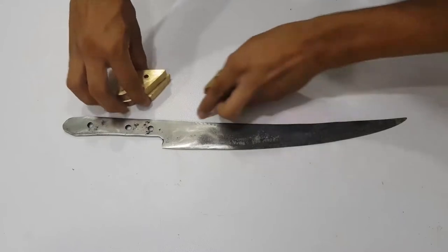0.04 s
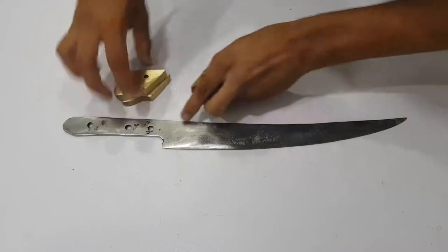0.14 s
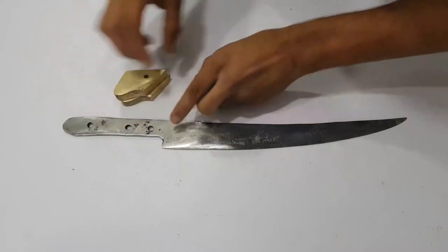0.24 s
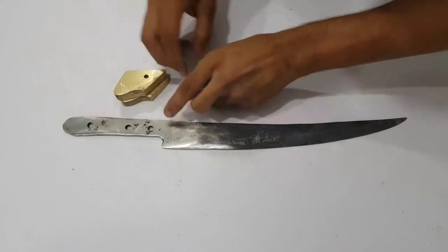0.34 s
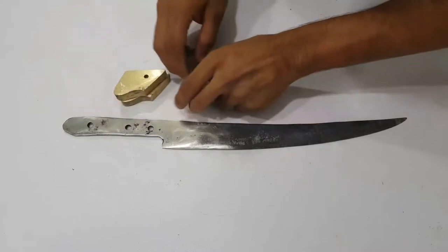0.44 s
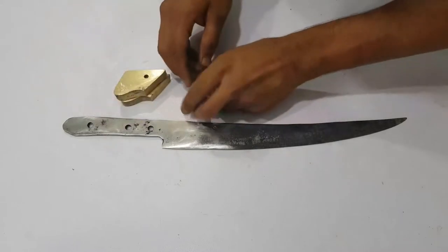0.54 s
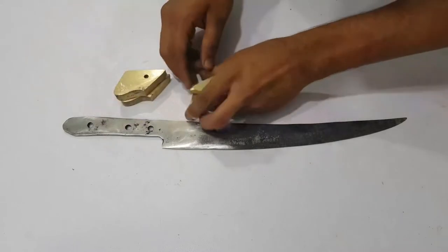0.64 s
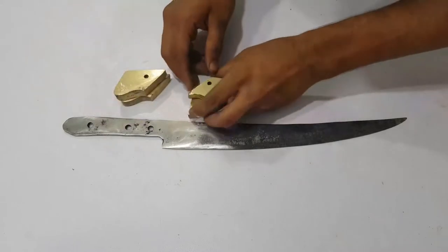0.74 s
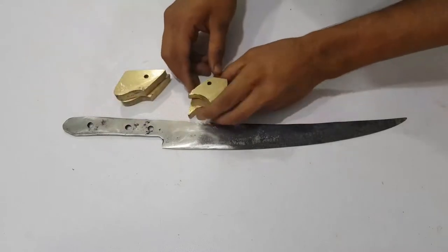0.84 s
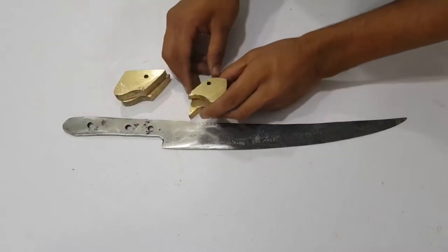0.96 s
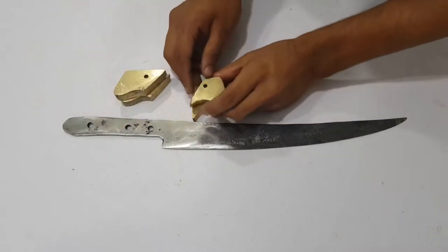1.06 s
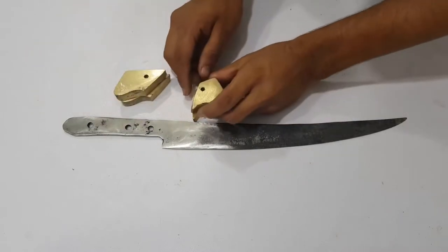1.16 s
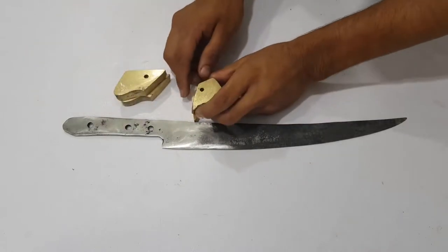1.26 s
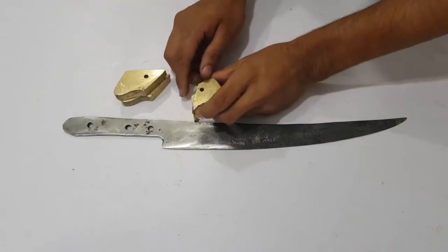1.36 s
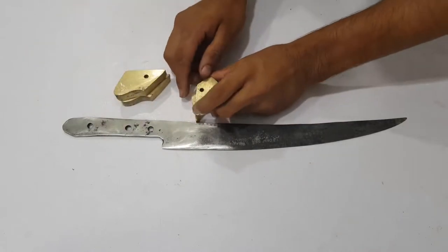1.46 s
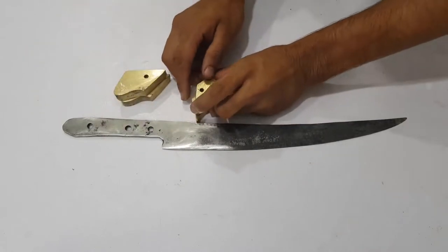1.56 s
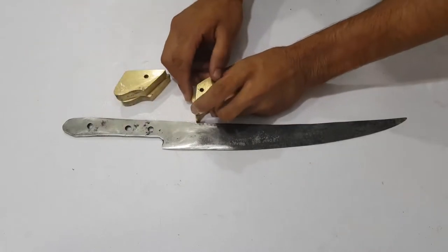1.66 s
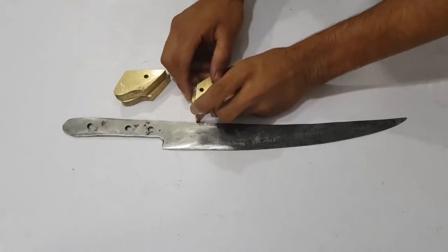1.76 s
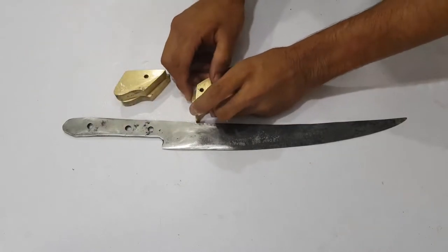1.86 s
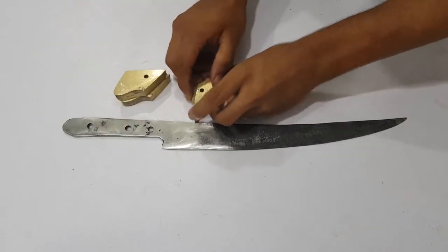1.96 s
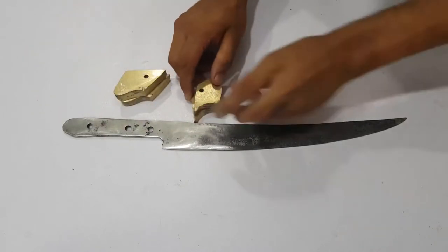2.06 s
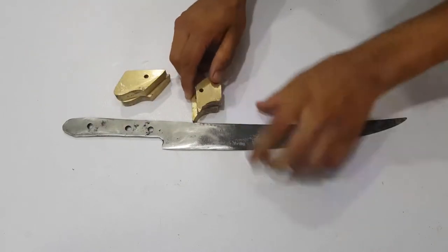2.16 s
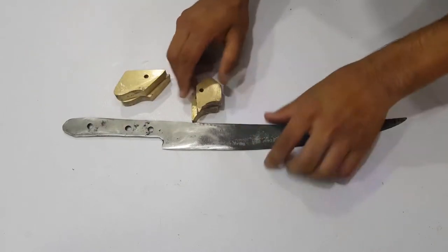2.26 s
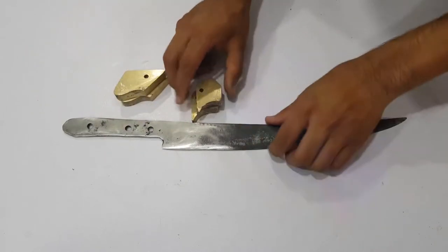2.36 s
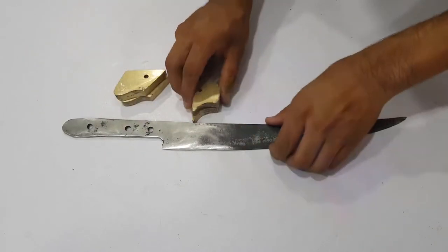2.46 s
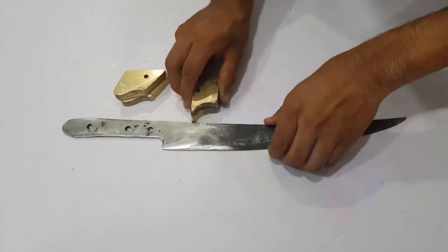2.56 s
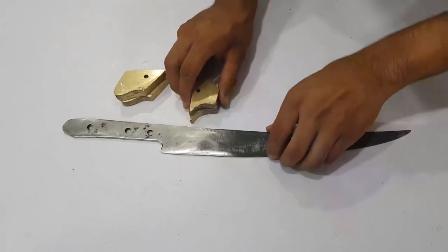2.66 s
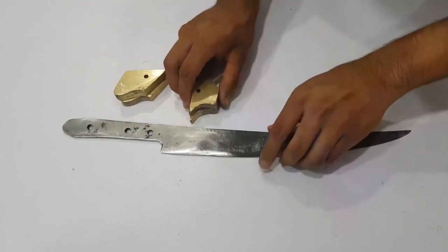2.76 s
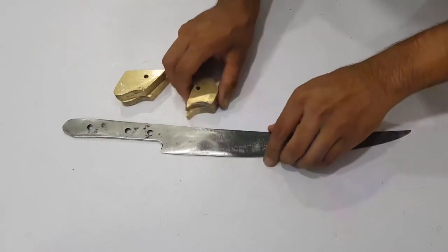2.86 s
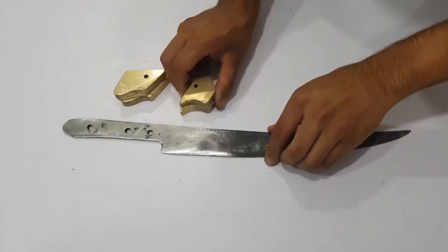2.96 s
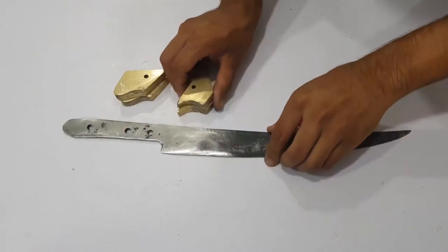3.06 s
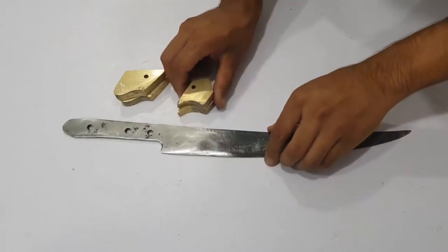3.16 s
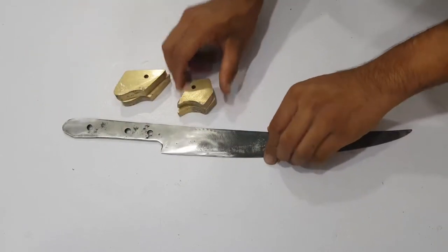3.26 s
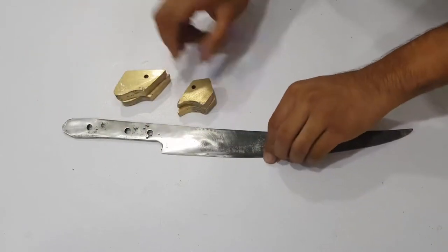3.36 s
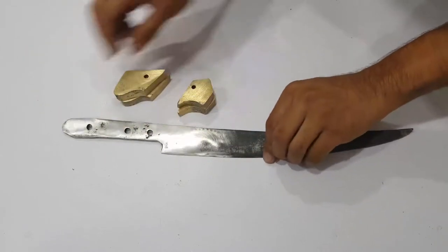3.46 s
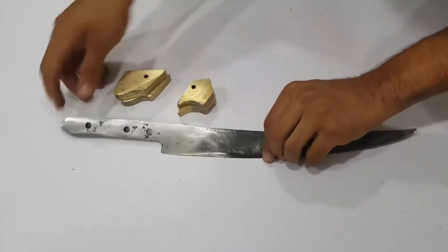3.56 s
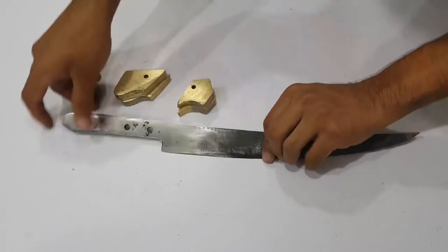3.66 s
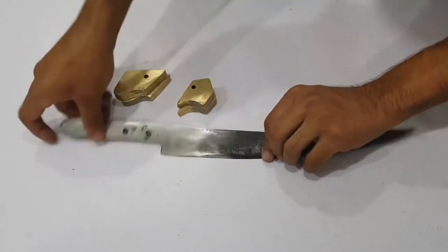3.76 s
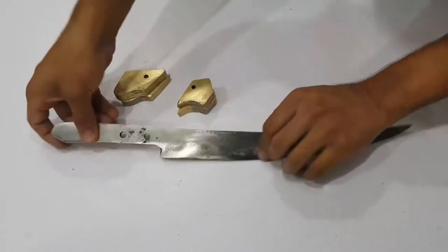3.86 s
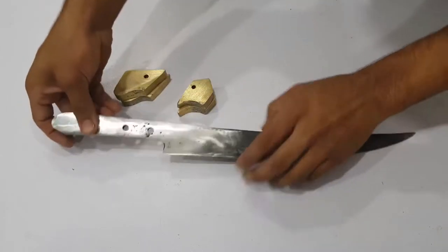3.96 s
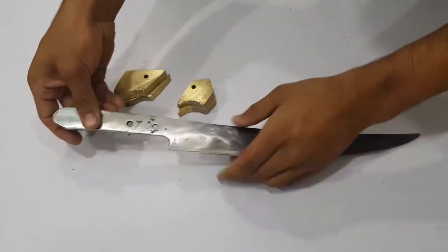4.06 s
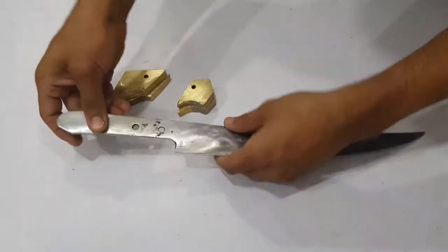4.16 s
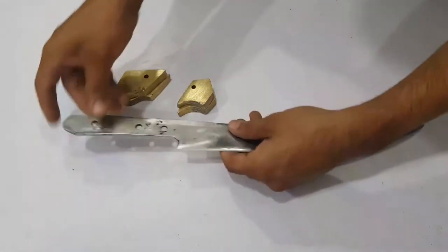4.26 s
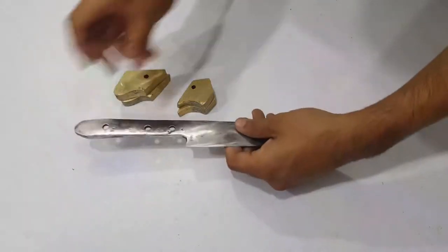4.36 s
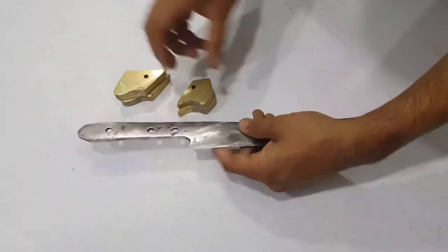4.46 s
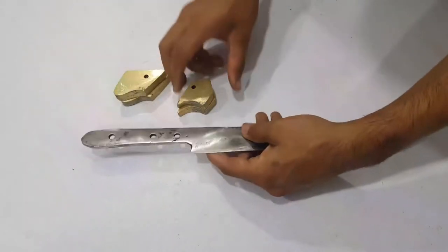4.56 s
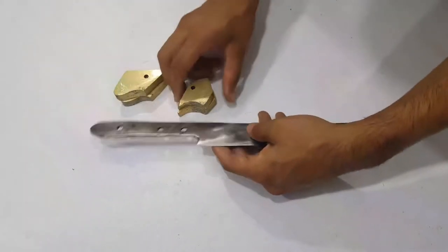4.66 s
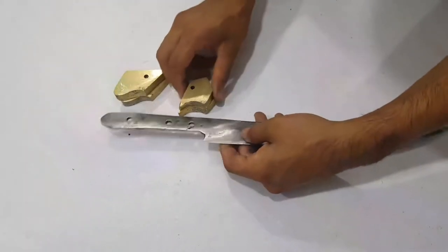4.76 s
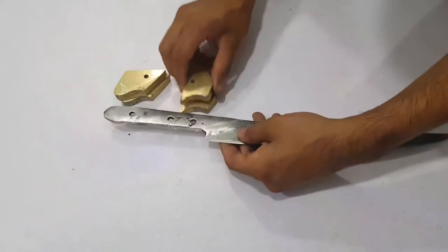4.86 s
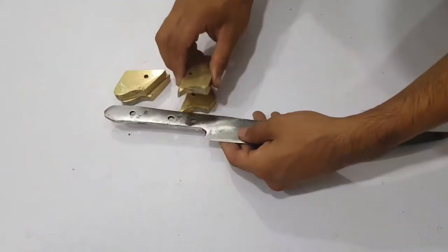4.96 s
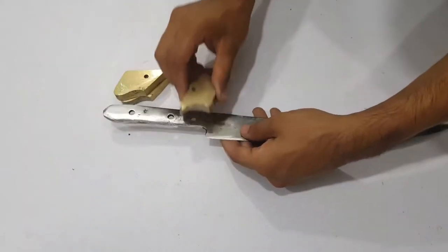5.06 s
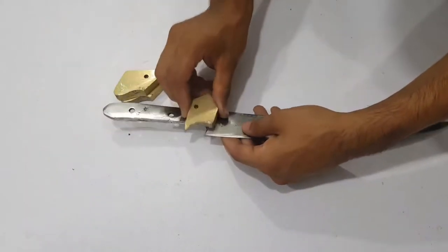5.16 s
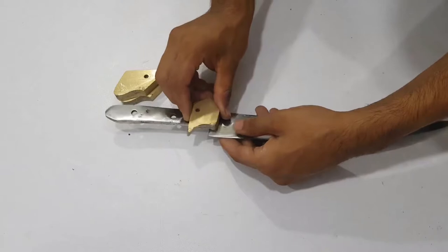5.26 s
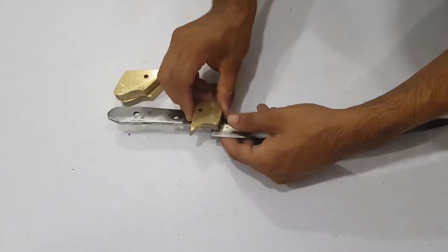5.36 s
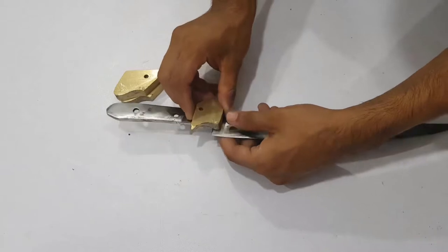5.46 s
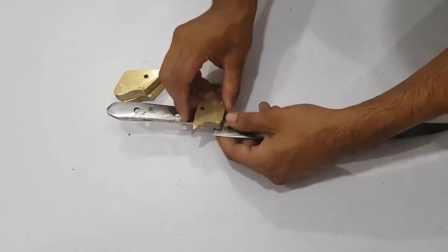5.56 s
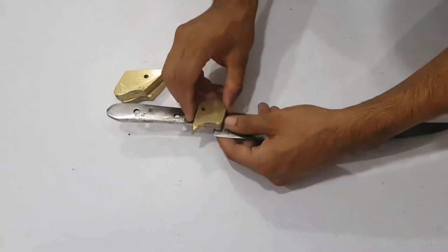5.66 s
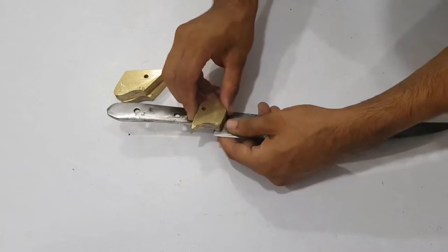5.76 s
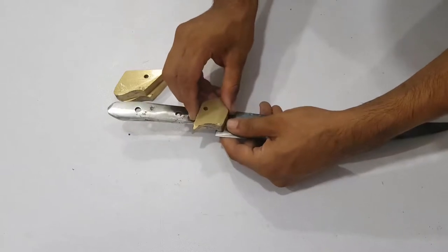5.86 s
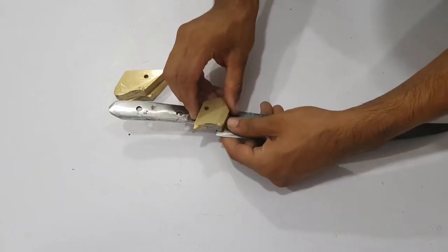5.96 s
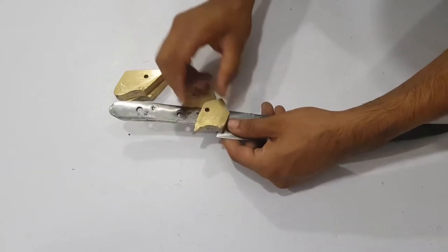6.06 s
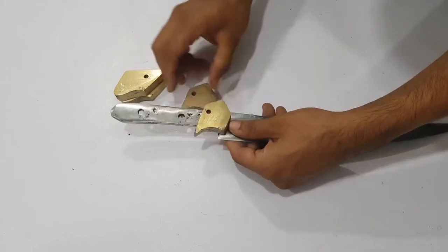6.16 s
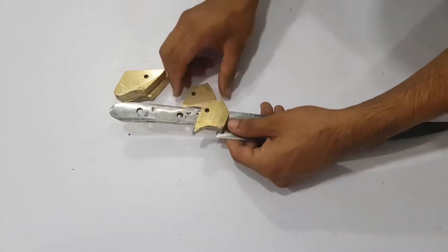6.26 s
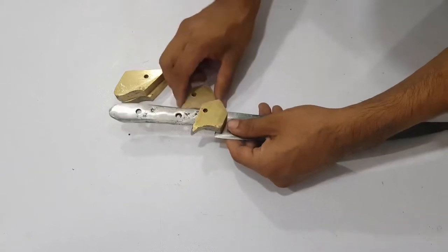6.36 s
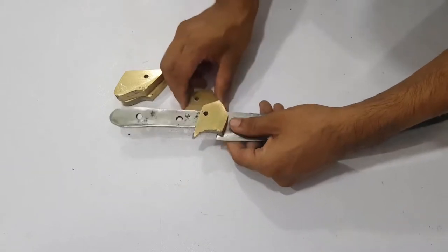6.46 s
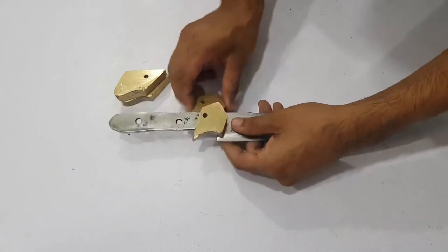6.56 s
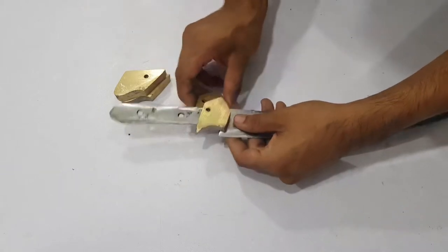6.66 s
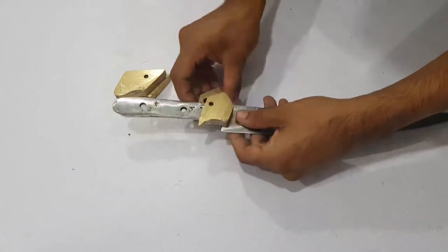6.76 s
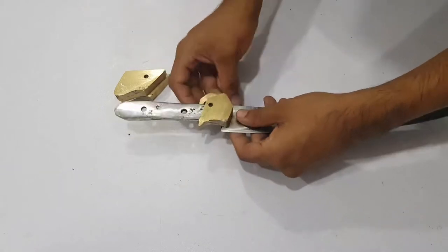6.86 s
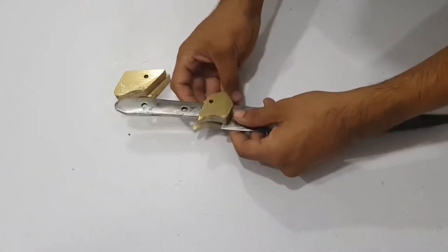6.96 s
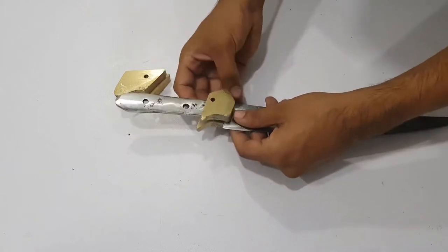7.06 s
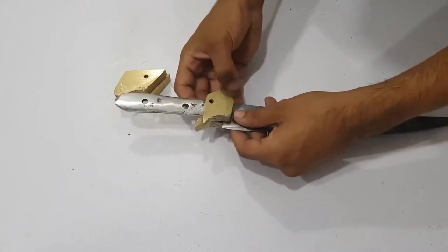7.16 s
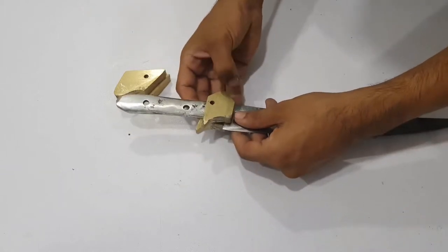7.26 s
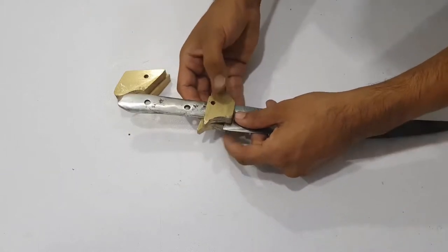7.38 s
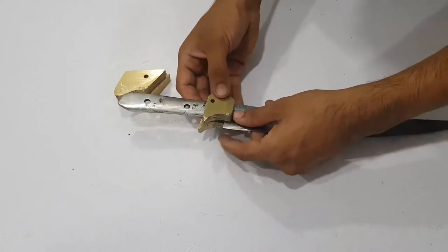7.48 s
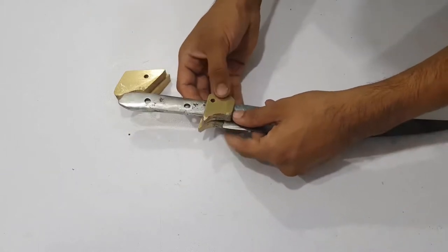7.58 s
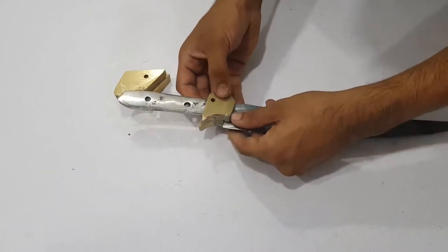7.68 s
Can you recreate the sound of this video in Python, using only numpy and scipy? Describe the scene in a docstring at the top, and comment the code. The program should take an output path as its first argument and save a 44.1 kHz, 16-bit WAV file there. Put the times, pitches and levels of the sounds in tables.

```python
"""Brass blocks are set down on a hard table top: minimum-phase knocks with decaying board and brass modes.
A steel blade is lifted, slid and fitted into them: each contact force excites its damped bending modes.
Things dragged along the top rub as filtered grains of noise, dull through the table, bright through edges.
A bare workshop answers with a decaying noise tail; rumble, hiss, mains hum and a far insect trill lie under."""
import sys
import numpy as np
from scipy import signal
from scipy.fft import rfft, irfft, next_fast_len
from scipy.io import wavfile
from scipy.ndimage import uniform_filter1d, map_coordinates

SR = 44100
rng = np.random.default_rng(int(sys.argv[2]) if len(sys.argv) > 2 else 0)


def inscribe(sig):
    """Save sig as 16-bit PCM at rate SR to the path in sys.argv[1].

    A 1-D sig is mono; a 2-D sig holds one channel per row.
    Samples are clipped to [-1, 1] before scaling.
    """
    pcm = np.round(np.clip(np.atleast_2d(sig).T, -1, 1) * 32767)
    wavfile.write(sys.argv[1], SR, pcm.astype(np.int16))


N = 340452  # samples in the scene
SIZE, LEAD = 2 ** 15, 64  # samples in one strike; samples kept free before its force


def amp(db):
    """Definition of the decibel: the amplitude gain of a level in dB."""
    return 10 ** (np.asarray(db) / 20)


def unit(x):
    """Normalization by mean power: x at rms 1."""
    return x / np.sqrt(np.mean(x ** 2) + 1e-20)


def along(points, hz):
    """Logarithmic frequency scale: (f/Hz, value) points interpolated over log frequency."""
    point_hz, values = np.transpose(points)
    return np.interp(np.log(hz + 1), np.log(point_hz + 1), values)


def wobble(rate):
    """Band-limited random modulation: a smooth curve through `rate` random knots per second."""
    knots = rng.standard_normal(int(N * rate / SR) + 4)
    return map_coordinates(knots, [np.arange(N) * rate / SR])


def filtered(x, response):
    """Convolution theorem: the spectrum of x times a complex response of frequency."""
    length = next_fast_len(N + SR // 2)
    hz = np.fft.rfftfreq(length, 1 / SR)
    return irfft(rfft(x, length) * response(hz), length)[..., :N]


def causal(db):
    """Minimum phase: folding the cepstrum gives these levels their most prompt causal response."""
    cepstrum = irfft(np.log(np.maximum(amp(db), 1e-6)))
    half = len(cepstrum) // 2
    cepstrum[1:half] *= 2
    cepstrum[half + 1:] = 0
    return np.exp(rfft(cepstrum))


def ringing(modes_hz, modes, hz, damping, scatter_db, force=None, favoured_hz=4500):
    """Modal superposition: damped resonators of random strength and sign, favoured near one pitch."""
    mode_hz = np.c_[modes_hz]
    level_db, t60_s = np.transpose(modes)[..., None]
    chance = rng.standard_normal((2, len(modes), 1))
    width_hz = np.log(1000) / np.pi / t60_s * np.clip(damping, .2, 8)
    favour_db = 11 * np.exp(-(np.log2(mode_hz / favoured_hz) / 0.11) ** 2)
    size = amp(level_db + favour_db + scatter_db * chance[0]) * np.sign(chance[1])
    if force is not None:  # every mode takes a fair share of the push, however the patter falls
        push = uniform_filter1d(np.abs(force), size=9)
        size = size / (np.interp(mode_hz, hz, push) + 0.055)
    resonance = 1j * hz / 2 / (mode_hz * mode_hz - hz * hz + 1j * hz * width_hz)
    return np.sum(size * SR / np.pi * resonance, axis=0)


# decay time of the workshop: (f/Hz, t60/s)
ROOM_DECAY = [(150, 0.68), (500, 0.45), (2000, 0.48), (6000, 0.45), (14000, .25)]
# left-right likeness of the room tail: (f/Hz, correlation)
ROOM_LIKENESS = [(200, 0.9), (500, 0.7), (1000, 0), (4000, 0), (12000, 0.2)]


def room_tail(hz):
    """Diffuse reverberation: a fresh stereo noise tail, decaying by band, its bass shared by both sides."""
    noise = rng.standard_normal((2, SR * 2 // 3))
    band_hz, t, bands = signal.stft(noise, SR, nperseg=256)
    decay_db = -60 * t / along(ROOM_DECAY, band_hz)[:, None]
    tail = signal.istft(bands * amp(decay_db), SR, nperseg=256)[1]
    mid, side = rfft(tail / np.linalg.norm(tail[0]), 2 * len(hz) - 2)
    turn = np.arccos(np.clip(along(ROOM_LIKENESS, hz), -1, 1)) / 2
    common, opposed = np.cos(turn) * mid, np.sin(turn) * side
    late = np.exp(-2j * np.pi * hz * .006)  # the tail starts 6 ms late
    return late * np.array([common + opposed, common - opposed])


def placed(hz, pan_db, lag_s):
    """Interchannel differences: the direct path is pan_db stronger and lag_s later on the left."""
    side = np.array([[.5], [-.5]])
    return amp(side * pan_db) * np.exp(-2j * np.pi * hz * lag_s * side)


EVENNESS = .8  # share of the patter's chance colour that evens out
PATTER_MS, PATTER_PER_RISE = 5.1, 0.39  # patter decay/ms, and ms more per ms of rise


def contact(rise_s, decay_s):
    """Impulsive excitation: the force of a first blow, then a dying patter of tiny re-contacts."""
    t = np.arange(SIZE // 4) / SR
    shape = (1 - np.exp(-(t / max(rise_s, 1e-4)) ** 2)) * np.exp(-t / max(decay_s, 5e-4))
    patter = rng.laplace(size=len(t)) * shape
    force = 1.1 * patter / np.linalg.norm(patter)
    force[0] += 0.16 * np.exp(-max(rise_s, 0) / 0.0015)  # the first blow
    push = rfft(np.pad(force, (LEAD, 0)), SIZE)  # room in front for the earlier channel
    lumps_db = 20 * np.log10(uniform_filter1d(np.abs(push), size=90) + .05)
    return push * causal(-EVENNESS * lumps_db)  # the patter pushes all pitches about alike


def strikes(rows, body, wet_db, pan_db):
    """Linear superposition: each row's force excites the body, heard directly and through the room."""
    out = np.zeros((2, N + SIZE))
    hz = np.fft.rfftfreq(SIZE, 1 / SR)
    for start_s, db, hard_db, *own, rise_ms in rows:
        patter_ms = PATTER_MS + PATTER_PER_RISE * rise_ms
        force = contact(rise_ms / 1000, patter_ms / 1000)
        dry = force * body(hz, force, start_s, db, rise_ms, hard_db, *own)
        loudest_power = uniform_filter1d(irfft(dry) ** 2, size=200).max()
        dry = dry / (2.5 * np.sqrt(loudest_power))  # the loudest few ms set the level
        heard = dry * (placed(hz, pan_db, lag_s=4e-5) + amp(wet_db) * room_tail(hz))
        out[:, round(start_s * SR):][:, :SIZE] += amp(db) * irfft(heard)
    return out[:, LEAD:N + LEAD]


# spectrum of rumble and hiss: (f/Hz, relative level/dB)
AIR_SPECTRUM = [(12, -51), (25, -26), (45, -13.5), (96, -6.5), (125, -10), (180, -7), (250, -22),
                (320, -25.5), (450, -32), (650, -37.5), (1500, -44.5), (5500, -46.5), (7600, -52.5),
                (13000, -44.5)]
# left-right likeness of rumble and hiss: (f/Hz, correlation)
AIR_LIKENESS = [(30, .92), (100, 0.89), (180, 0.79), (400, 0.65), (1500, 0.07), (12000, 0.052)]
# course of rumble, hiss and hum: (t/s, level/dB)
AIR_LEVEL = [(0.0, -61.5), (0.79, -57.5), (1.46, -64.5), (1.68, -65), (2.75, -57.5), (3.53, -61),
             (4.32, -56.5), (4.6, -60), (5.01, -57.5), (5.52, -60.5), (6.23, -62), (6.64, -57.5),
             (7.1, -60.5), (7.27, -58), (7.72, -61.5)]


def background():
    """Continuous noise and tone of changing level: rumble and hiss, wavering mains hum, an insect trill."""
    t = np.arange(N) / SR

    def air_response(hz):
        turn = np.arccos(np.clip(along(AIR_LIKENESS, hz), -1, 1)) / 2
        rolled_off = amp(along(AIR_SPECTRUM, hz)) / (1 + (hz / 13200) ** 20)
        return rolled_off * [np.cos(turn), np.sin(turn)]

    def wing_response(hz):  # two equal resonances in a row
        return (1j * hz * 260 / (6490 ** 2 - hz * hz + 1j * hz * 260)) ** 2

    mid, side = filtered(rng.standard_normal((2, N)), air_response)
    air = unit(np.array([mid + side, mid - side]))
    hum = amp(1 + 0.22 * wobble(3.5)) * np.sin(2 * np.pi * 100 * t + 0.29 * wobble(17))
    level = amp(np.interp(t, *np.transpose(AIR_LEVEL)))
    trill = unit(filtered(rng.standard_normal((2, N)), wing_response))
    trill = trill * amp(-77.5 + 3.8 * wobble(54))
    return level * (air + amp([[.45], [-.45]]) * hum) + trill


# spectrum of the table top's knock, also heard in the dull rub: (f/Hz, relative level/dB)
TABLE_SPECTRUM = [(150, -35), (270, -23), (340, -8.5), (600, -1.5), (850, -3.5), (1080, -3.5), (1500, -7.5),
                  (2000, -14.5), (2850, -17.5), (3800, -27.5), (6500, -34.5), (8400, -40.5), (12000, -41.5),
                  (15500, -47)]
# pitches of the table board's modes: (f/Hz)
BOARD_HZ = [170, 255, 340, 465, 585, 672, 790, 950, 1085]
# ring of those modes before damping and scatter: (level/dB, t60/s)
BOARD_RING = [(-42, 0.095), (-40.5, 0.1), (-36, 0.14), (-37, 0.15), (-33.5, 0.36), (-37, 0.25), (-33.5, .2),
              (-33.5, 0.083), (-32, 0.13)]
# pitches of a brass block's modes: (f/Hz)
BRASS_HZ = [11320, 13630, 15220]
# ring of those modes before damping and scatter: (level/dB, t60/s)
BRASS_RING = [(-12.5, .08), (-5, .1), (7.5, .12)]
# a block rings on a sharp blow: base level/dB, dB per dB of blow, dB lost per ms of rise
BRASS_DB, BRASS_GROWS, BRASS_LOSS_DB_PER_MS = -28.5, 0.27, 5


def table_top(hz, force, start_s, db, rise_ms, hard_db, spot_hz):
    """Impact spectrum: a harder blow is brighter, the spot hit has its pitch, board and block ring on."""
    spot_db = 9 * np.exp(-(np.log2((hz + 1) / spot_hz) / 0.18) ** 2)
    tilt_db = hard_db * np.log2(hz / 800 + .1)
    knock = causal(along(TABLE_SPECTRUM, hz) + spot_db + tilt_db)
    knock = knock / np.abs(irfft(knock)).max()
    board = ringing(BOARD_HZ, BOARD_RING, hz, damping=0.97, scatter_db=2.0, force=force, favoured_hz=spot_hz)
    brass_db = BRASS_DB + BRASS_GROWS * db - BRASS_LOSS_DB_PER_MS * rise_ms
    brass = ringing(BRASS_HZ, BRASS_RING, hz, damping=0.88, scatter_db=3.5, force=force)
    return knock + board + amp(brass_db) * brass


# blocks and blade set down on the table or shoved along it:
# (t/s, relative level/dB, hardness/(dB per octave), spot's pitch f/Hz, rise/ms)
BUMPS = [(0.002, -28, 1.3, 623, 3.2), (0.018, -26.5, -2.3, 950, 6.2), (0.585, -21.5, 1.55, 620, 1.6),
         (0.752, -26.5, -5.5, 794, .6), (0.776, -10, 2.8, 560, 0.9), (0.786, -16.5, 4.5, 690, 1.4),
         (1.379, -52, -1.5, 820, 1.4), (1.551, -56, -2.5, 620, 4.2), (2.028, -61.5, 0, 353, 14),
         (2.11, -46, -4, 760, .6), (2.202, -46.5, -6, 950, 6), (2.259, -46.5, -5.5, 656, 7.1),
         (2.381, -49, 2, 1070, 16), (2.482, -40, 2.2, 1050, 3), (2.552, -40, -5, 980, 10),
         (2.593, -40, -4, 890, 5.8), (2.724, -34, 4.9, 1030, 10.6), (2.744, -31, 3.1, 724, 13),
         (2.85, -55, -5.8, 447, 8.9), (2.944, -41.5, -4, 450, .9), (3.033, -42.5, -6, 562, 6),
         (3.058, -45.5, 2.8, 583, 4), (3.683, -50, 3, 725, 4.3), (3.781, -38, -8, 900, 0.75),
         (3.815, -42.5, -1, 1050, 1.5), (3.887, -43.5, 3.9, 1040, .8), (3.991, -33.5, 2, 544, 6.4),
         (4.004, -25.5, -6.5, 1110, 0.63), (4.309, -47, -4, 800, 10.77), (4.378, -45.5, 9, 813, 5),
         (4.795, -33, -5, 523, 0.561), (4.819, -39.5, -3.5, 580, 2.8), (5.322, -43, 1.06, 720, 1.3),
         (5.597, -45.5, -9, 603, 2.95), (6.32, -58, -13, 650, 6.2), (6.466, -33.5, -5.5, 880, 13.5),
         (6.483, -36.5, 0, 454, 5.6), (6.814, -45.5, 3.5, 420, 2.1), (7.102, -36, 0.3, 763, 1.1),
         (7.233, -43, -4.5, 1370, 3), (7.252, -51.5, -9.5, 420, 1), (7.606, -54.5, -9.5, 742, 0.63)]


def table_knocks():
    """Impact radiation: every bump sets the table top sounding, the direct sound stronger on the left."""
    return strikes(BUMPS, table_top, wet_db=3.0, pan_db=7.5)


# spectrum of hard edges grazing, in the bright rub and the blade's crack: (f/Hz, relative level/dB)
EDGE_SPECTRUM = [(900, -43), (1600, -5.5), (2400, -0.5), (4000, 2), (6000, -3.5), (9000, -9),
                 (13000, -19.5), (16000, -30)]
# pitches of the blade's bending modes: (f/Hz)
STEEL_HZ = [470, 790, 1220, 1630, 2350, 2490, 2915, 3010, 3670, 3830, 4520, 4600, 5310, 5440, 5545, 5960,
            6310, 6530, 6640, 7570, 8670, 9350, 9960, 10440, 11260, 11910, 12480, 13760, 14620, 15400]
# ring of those modes before the hand's damping and scatter: (level/dB, t60/s)
STEEL_RING = [(-30.5, 0.082), (-45, 0.66), (-26, 0.21), (-23.5, 0.25), (-11, 0.12), (-7, 0.085),
              (-16, 0.47), (-5.5, 0.083), (-5.5, 0.079), (-5, 0.14), (-13.5, 0.36), (-9, 0.12),
              (-13.5, 0.043), (-2, 0.052), (-7, 0.2), (-20.5, 0.09), (-14, 0.16), (-4.5, 0.11), (-4, 0.095),
              (-10.5, 0.11), (-9, 0.098), (-21.5, 0.14), (-6.5, 0.05), (-15, 0.19), (-19, 0.67),
              (-8, 0.074), (-19.5, 0.11), (-17.5, .12), (-35.5, 0.083), (-23.5, .06)]
# things dragged over the top: (middle t/s, half length/s, dull rub's relative level/dB, bright rub's/dB)
STROKES = [(1.15, 0.16, -57.5, -64.5), (1.268, 0.034, -61.5, -80.5), (2.096, 0.054, -75, -69),
           (2.235, 0.2, -59.5, -75), (2.42, .09, -102, -55.5), (2.634, 0.19, -79.5, -87),
           (2.76, 0.052, -42, -46.5), (3.051, 0.046, -51, -63.5), (3.118, 0.078, -61, -62.5),
           (3.801, 0.16, -60, -65), (4.083, 0.16, -62, -56.5), (4.293, 0.19, -54.5, -63),
           (4.38, 0.068, -57, -80.5), (4.703, 0.26, -67, -68.5), (4.924, 0.12, -50.5, -51),
           (5.105, 0.17, -61, -62), (5.275, 0.02, -55.5, -67.5), (5.588, 0.091, -69.5, -56.5),
           (6.378, 0.1, -70, -93.5), (7.217, 0.067, -65.5, -60.5), (7.467, .09, -66.5, -65),
           (7.696, 0.14, -75, -75.5)]
STROKE_FALL_DB = 14  # from the middle of a stroke to its ends


def rubbing():
    """Friction as random micro-impacts: grains dull through the table, bright through edges and blade."""
    t = np.arange(N) / SR
    strokes = np.zeros((2, N))
    for middle_s, half_s, *levels_db in STROKES:
        strokes += amp(np.c_[levels_db] - STROKE_FALL_DB * ((t - middle_s) / half_s) ** 2)

    def table_response(hz):
        return amp(along(TABLE_SPECTRUM, hz) - 14.2 * np.log2(hz / 800 + 1))

    def edge_response(hz):
        steel = ringing(STEEL_HZ, STEEL_RING, hz, damping=5.4, scatter_db=2.0, favoured_hz=2270)
        return amp(along(EDGE_SPECTRUM, hz) + 35.5) + steel

    def heard_response(hz):
        return placed(hz, pan_db=5.5, lag_s=4e-5) + amp(-3) * room_tail(hz)

    grains = rng.standard_normal((2, N)) ** 3  # cubing makes the noise sparse
    grains = grains * amp([4 * wobble(25), 4 * wobble(20)])
    dull = unit(filtered(grains[0], table_response))
    bright = unit(filtered(grains[1], edge_response))
    rub = amp(-2.5) * strokes[0] * dull + amp(-10) * strokes[1] * bright
    return filtered(rub, heard_response)


# how hard the hand damps the blade: (t/s, factor on the width of each mode)
GRIP = [(2.3, 3.1), (2.8, 0.4), (3.8, 1.3), (4.3, 1.03), (4.9, 2), (5.3, 1.7), (6.7, 3.45), (7.2, 5)]


def blade(hz, force, start_s, db, rise_ms, hard_db, favoured_hz, ring_db):
    """Bending vibration: hand-damped modes ring over a short crack, both tilted by the hardness."""
    crack = amp(25.5 - ring_db) * causal(along(EDGE_SPECTRUM, hz))
    tilt = causal(hard_db * np.log2(hz / 4500 + .1))
    damping = np.interp(start_s, *np.transpose(GRIP))
    ring = ringing(STEEL_HZ, STEEL_RING, hz, damping, scatter_db=2.5, force=force, favoured_hz=favoured_hz)
    return tilt * (crack + ring)


# the blade struck, grazed by brass or rocking on the table:
# (t/s, relative level/dB, hardness/(dB per octave), favoured pitch f/Hz, relative ring over crack/dB, rise/ms)
CLINKS = [(2.320, -57.5, -15, 6560, -4, 1.3), (2.384, -48.5, -10, 2340, -18, 17),
          (2.485, -46, -6, 2470, -13, 4.9), (2.584, -57, -8, 2460, 12, 12), (2.635, -59, -8, 2400, 14, 12),
          (2.725, -38, 9, 3624, 4, 15), (2.75, -33.5, -5, 4850, -9.5, 17),
          (2.944, -46, -15.5, 2460, -21, 0.96), (3.781, -79, -10, 724, 9, 2.1),
          (3.865, -52, 3.5, 2490, -2, 1.5), (4.003, -46.5, -2.5, 1190, 5, 0.75),
          (4.232, -44.5, -0.3, 4040, -4, 2.5), (4.242, -56, 3, 799, 12.5, 1.2),
          (4.310, -46, -8, 1220, 8, 4.4), (4.334, -42, -0.7, 4220, -1, 18),
          (4.362, -35, -2.9, 4830, -3, 20), (4.379, -53, 2, 789, 8.5, 0.77),
          (4.41, -45.5, -8, 2940, 13, 8.2), (4.793, -29, 6, 4510, 2.5, 1.2),
          (4.815, -32.5, -0.5, 4405, -6.3, 8.8), (4.930, -41.5, 1.7, 4680, -10.5, 16),
          (5.019, -47, -7, 2295, -5, 3.4), (5.127, -48, 0.8, 2975, 1.5, .8),
          (5.194, -51, -1, 2950, 2.2, 2.2), (5.286, -12.5, 1, 4470, -1, 1.3),
          (5.598, -41.5, 1, 3140, -4, 1.7), (6.681, -21, -3.7, 3970, 8.5, 1.2),
          (6.686, -20.5, -3.5, 5300, 7, 4), (6.770, -43, -8, 5240, 8.5, 5), (6.814, -34, -6, 2790, 3, 4.4),
          (6.82, -36.5, 1.6, 6400, 9, 2.7), (7.043, -28, -0.7, 5360, -1.5, 0.43),
          (7.069, -35, -4.8, 4440, 2, 8.8), (7.106, -14.5, 2, 5940, 0, 8.4),
          (7.235, -28, -3.5, 5470, 4, 4.7), (7.256, -35, -0.9, 3590, 8, 8.9),
          (7.601, -54.5, 13.5, 5660, -5, 0.78)]


def blade_clinks():
    """Modal excitation by impact: every clink sets the blade ringing, the direct sound stronger on the left."""
    return strikes(CLINKS, blade, wet_db=-1.43, pan_db=7)


def scene():
    """Superposition of sources: everything on the table, in the room, over the background."""
    return background() + table_knocks() + rubbing() + blade_clinks()


# moments at which the level dips briefly: (t/s)
DIPS = [4.79, 5.058, 5.277, 5.583, 6.669, 7.039]
DIP_S, DIP_DB = 0.0079, 8  # Gaussian width and depth of a dip
TOP_HZ = 16100  # band limit


def record(dry):
    """Amplitude modulation and band limiting: the level dips briefly; nothing is kept above the limit."""
    t = np.arange(N) / SR
    dip_db = sum(DIP_DB * np.exp(-((t - s) / DIP_S) ** 2) for s in DIPS)
    return filtered(dry * amp(-dip_db), lambda hz: hz < TOP_HZ)


dry = scene()
out = record(dry)
inscribe(out)
```